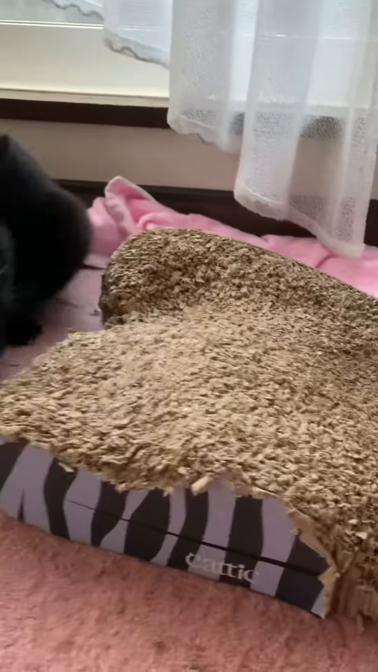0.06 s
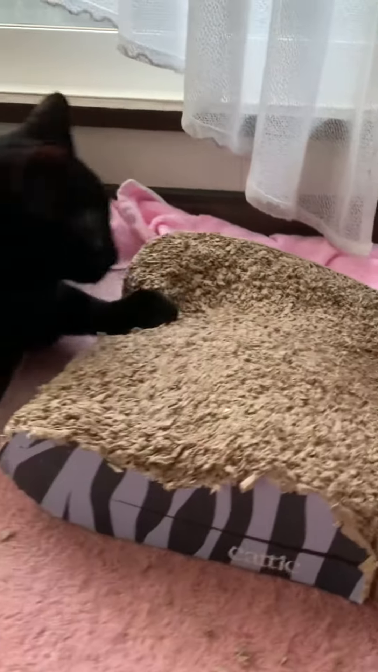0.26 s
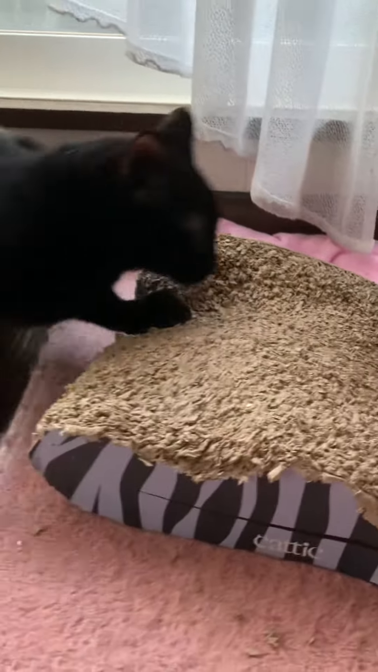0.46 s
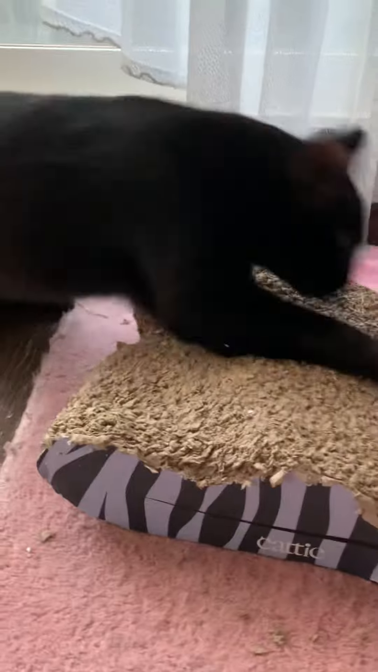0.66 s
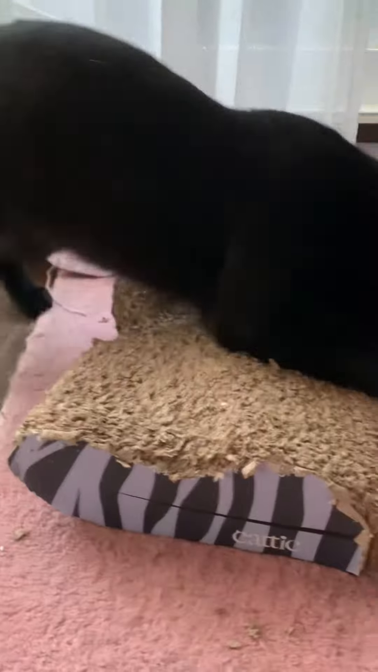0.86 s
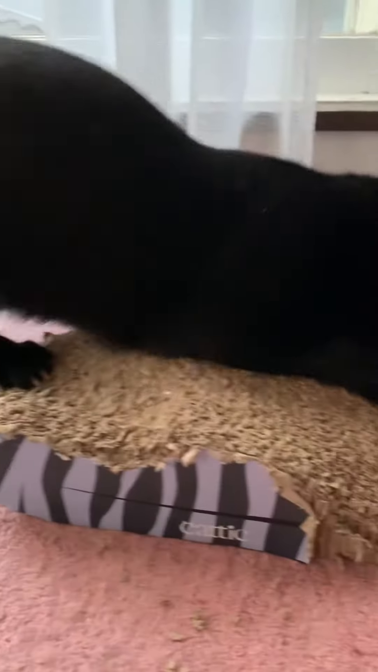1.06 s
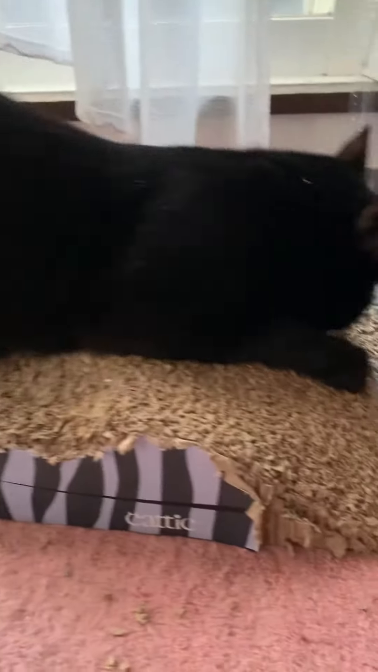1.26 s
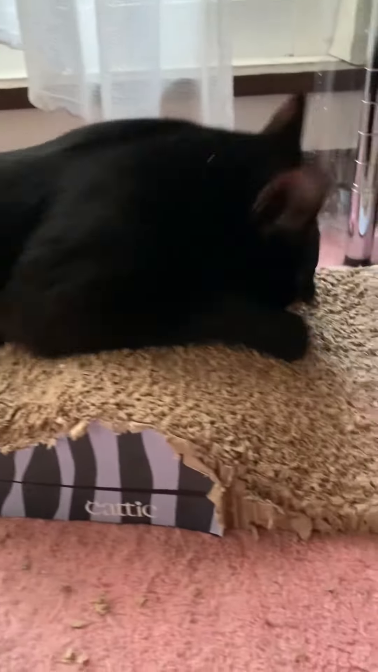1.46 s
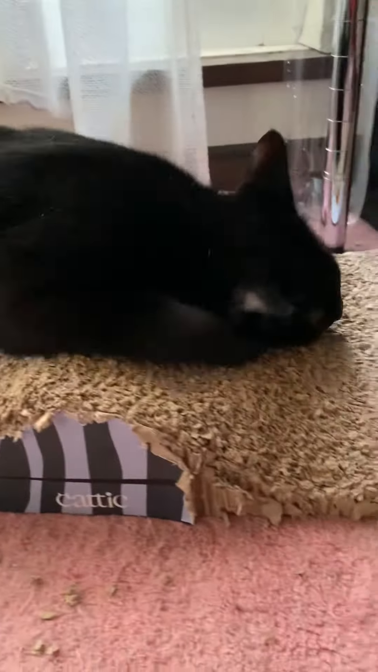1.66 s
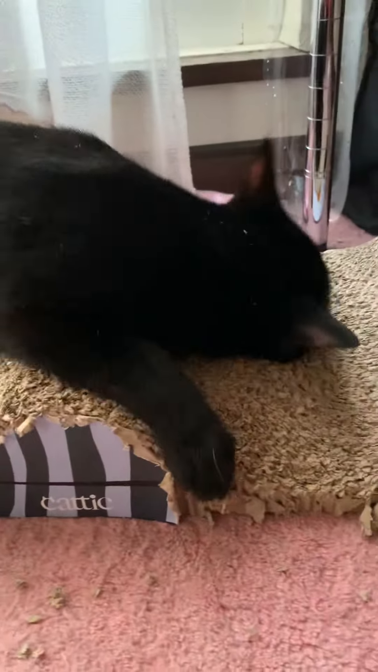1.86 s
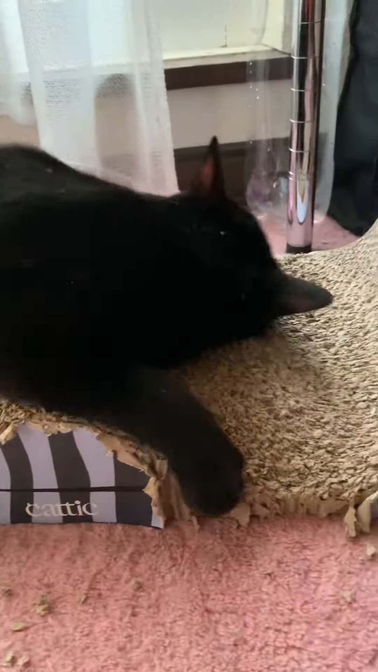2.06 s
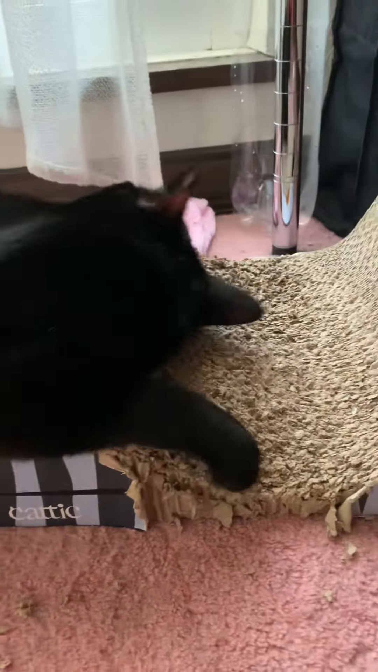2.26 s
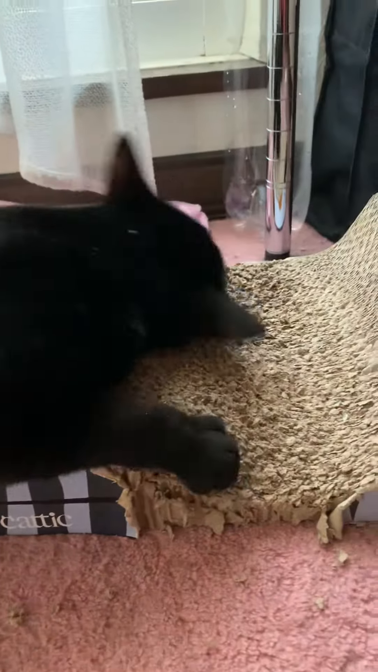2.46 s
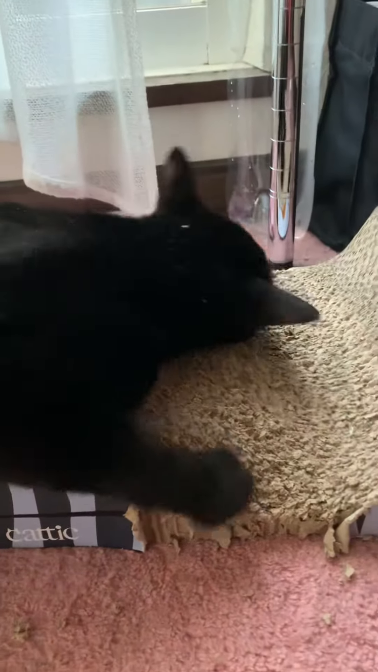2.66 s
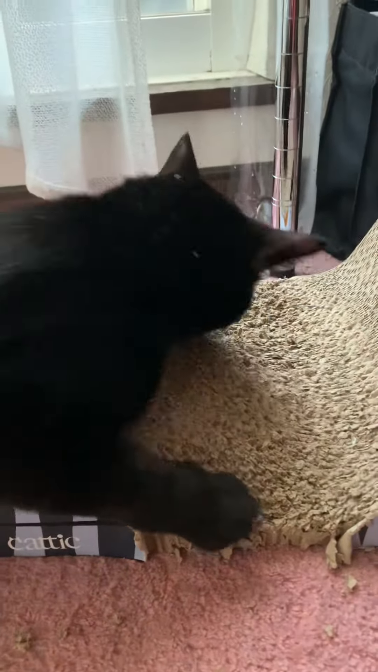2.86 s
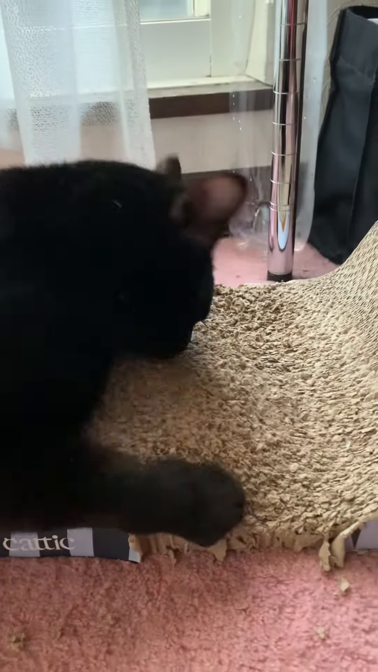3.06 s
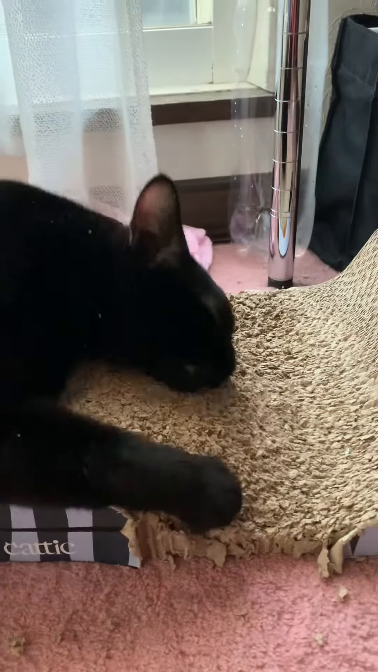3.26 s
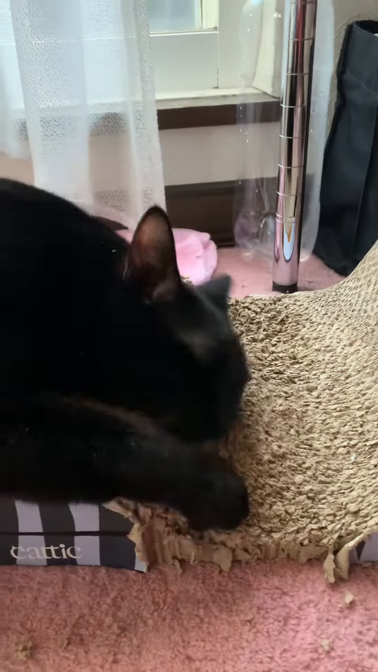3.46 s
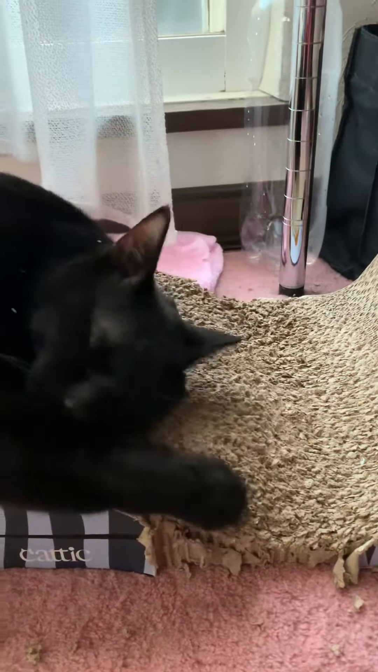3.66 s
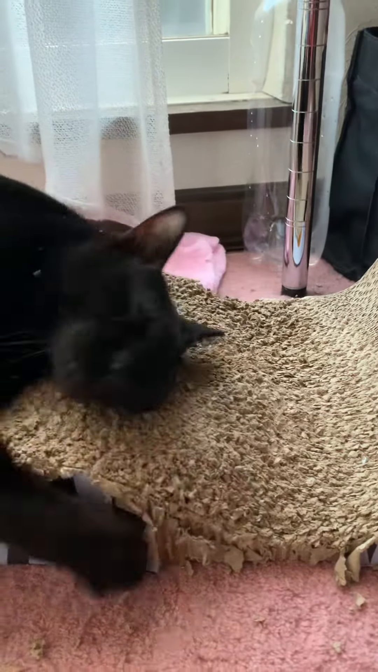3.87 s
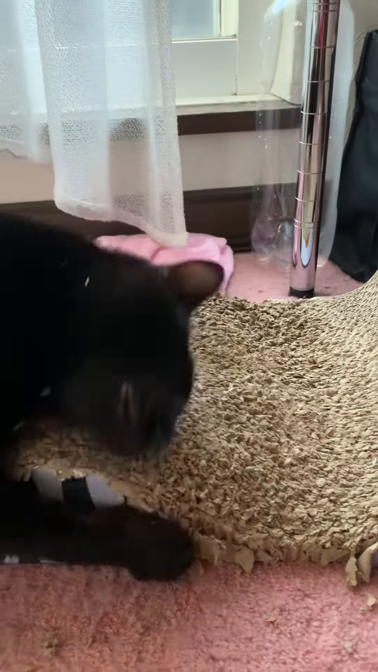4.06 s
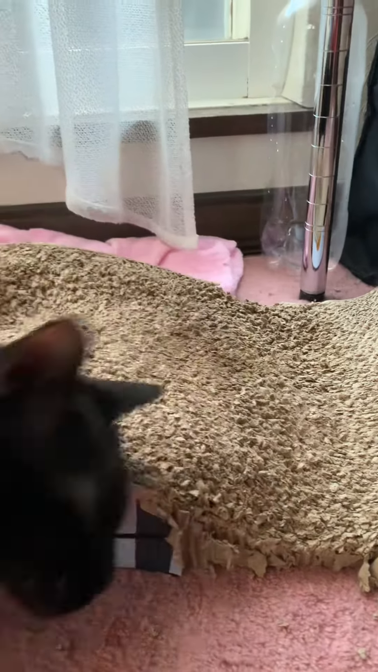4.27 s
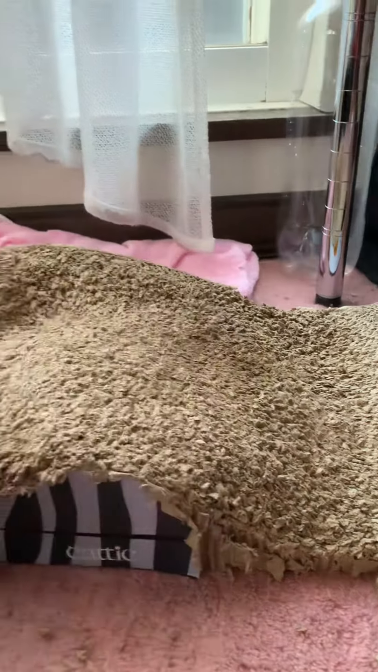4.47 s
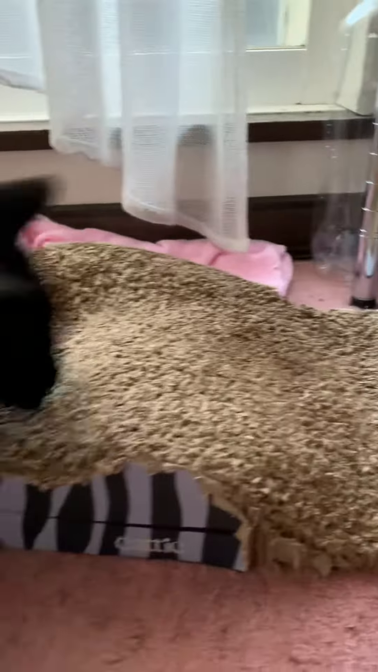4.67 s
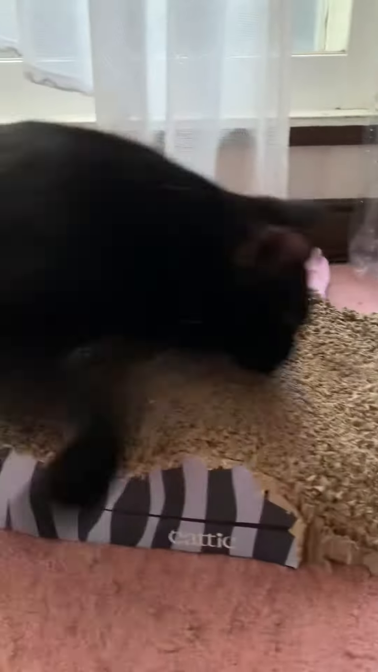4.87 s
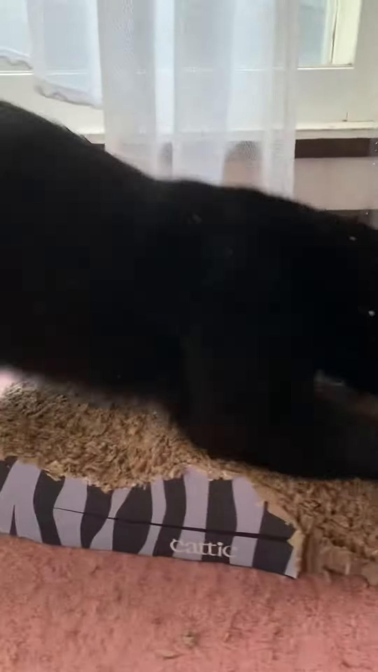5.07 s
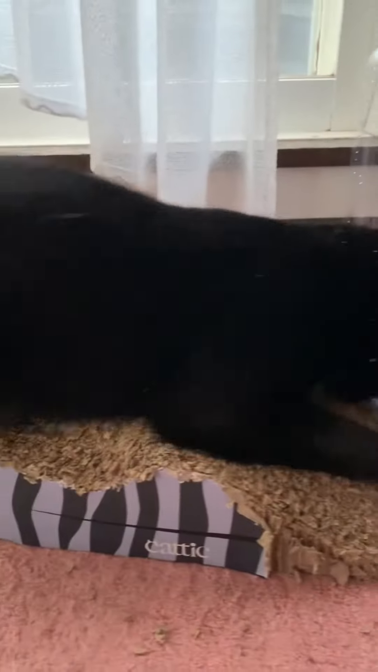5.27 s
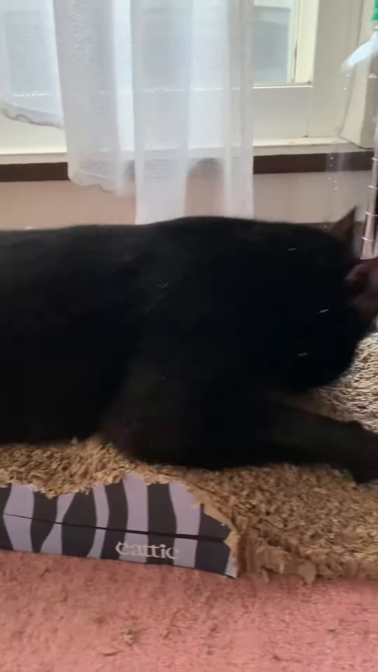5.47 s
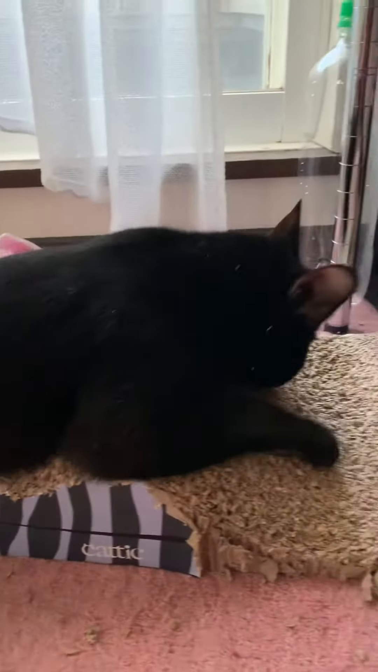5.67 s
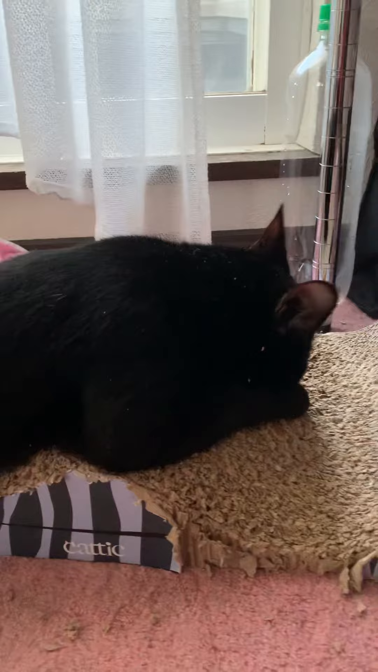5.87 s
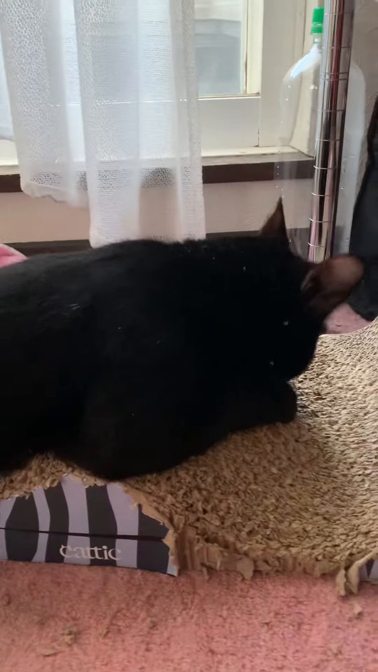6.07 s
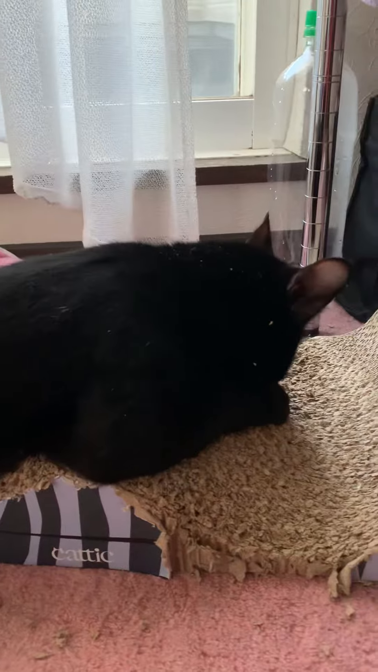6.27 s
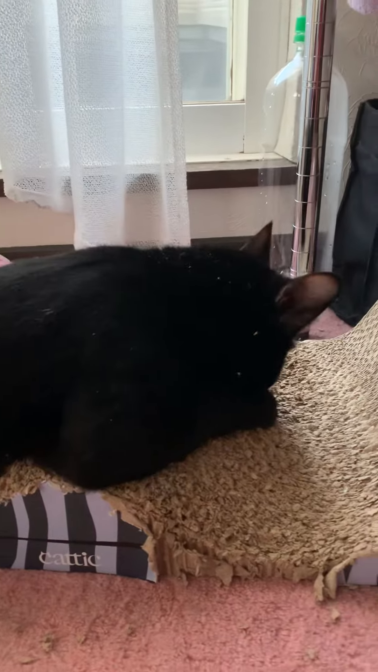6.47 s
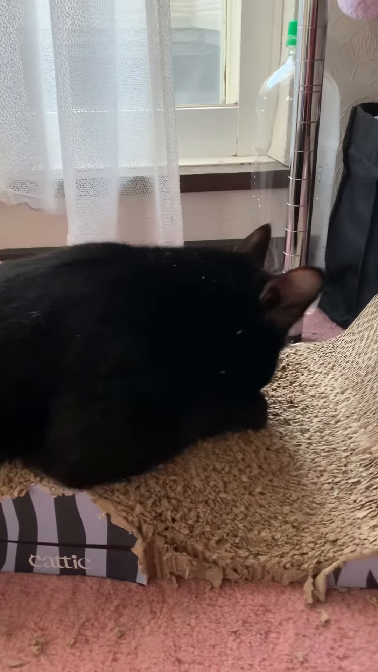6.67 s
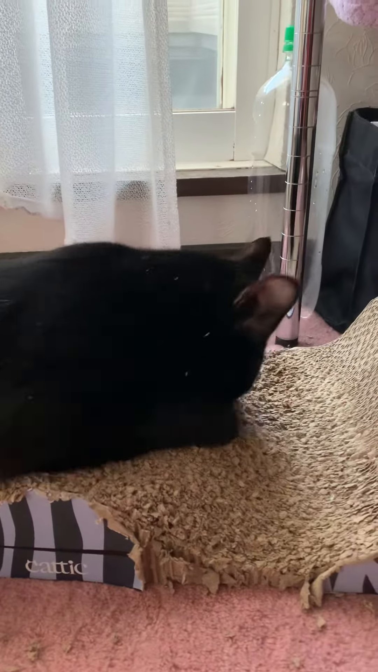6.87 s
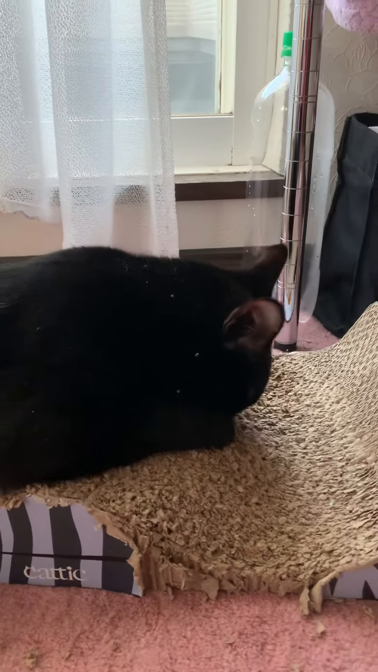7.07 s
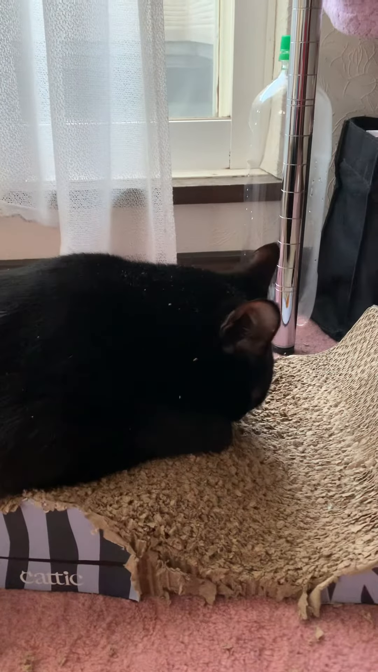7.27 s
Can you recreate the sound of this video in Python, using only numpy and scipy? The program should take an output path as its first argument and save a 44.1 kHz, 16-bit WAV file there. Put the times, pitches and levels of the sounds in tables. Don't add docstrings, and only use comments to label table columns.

```python
import sys
import numpy as np
from scipy import signal
from scipy.fft import rfft, irfft, next_fast_len
from scipy.io import wavfile
from scipy.ndimage import uniform_filter1d

SR = 44100
rng = np.random.default_rng(int(sys.argv[2]) if len(sys.argv) > 2 else 0)


def log_audio(samples):
    frames = np.atleast_2d(samples).T
    limited = np.clip(frames, -1, 1)
    pcm = np.round(limited * 32767).astype(np.int16)
    wavfile.write(sys.argv[1], SR, pcm)


def linear_from_db(decibels):
    return 10 ** (np.asarray(decibels, float) / 20)


N = 322812
TIME_S = np.arange(N) / SR
HZ = np.fft.rfftfreq(next_fast_len(N + SR), 1 / SR)

# time in seconds, pressure in dB, sharpness (fizz re crush) in dB.
CONTACT = [(0, -68.5, -1.5), (0.11, -70, -19.5), (0.33, -70, -11.5), (0.6, -76.5, -9.5), (1.15, -68.5, -13),
           (1.6, -71, -8.5), (2.45, -66, -16), (2.87, -64.5, -5.5), (3.0, -74.5, 3.5), (3.25, -65, -6),
           (3.85, -68.5, 1), (4.47, -81.5, 1), (4.7, -81, -5.5), (5.28, -68.5, -7.5), (5.86, -74, -8),
           (6.2, -83, -17), (6.7, -84, -3), (7.32, -69, -40)]
# start in seconds, length in seconds, pressure in dB, swell to the end in dB, sharpness in dB.
PULLS = [
    (1.242, 0.27, -53, -10, -26),
    (1.655, 0.42, -62, 0.9, -3),
    (2.032, 0.37, -68.5, 4, 8.5),
    (2.496, 0.24, -64, 10, -5),
    (3.46, 0.3, -82, 14.5, 8.5),
    (3.907, 0.28, -63.5, 10.5, -5.5),
    (4.276, 0.17, -51.5, -15, -7.5),
    (4.978, 0.23, -60.5, -9, -12),
    (5.32, 0.22, -64.5, 13.5, -5.5),
    (5.622, 0.19, -70, -6, -7),
]
# crest in seconds, pressure in dB, sharpness in dB, length in ms, paper hiss in dB.
STROKES = [(0.207, -56, 0, 26, -10), (0.767, -44, -43, 19, -10), (0.815, -40, -22, 58, -23),
           (0.953, -55.5, -4.5, 31, -1), (1.256, -54, 0, 8, 1), (1.353, -40, -9.5, 31, -0.5),
           (2.075, -79, 24, 17, -7), (2.116, -45, -4, 21, -10), (2.296, -47.5, -6, 41, -5),
           (2.544, -75, 26, 4.4, -16), (2.783, -37, -14, 9.9, -4), (3.345, -57.5, -14, 70, -11),
           (3.511, -51, -29, 80, 10), (3.644, -48, -39, 9.4, -5), (3.897, -39, -55, 19, -15),
           (4.587, -62, 6.5, 64, -1), (4.779, -52, -17, 46, 0), (4.982, -52.5, 0, 26, 2.5),
           (5.209, -55, -12, 27, 8), (0.812, -51, 6, 3.9, 1), (0.822, -50, 2, 7, -1),
           (5.097, -40.5, 1, 22.5, -6.5), (5.123, -55, 2, 11, 9.5), (5.523, -34.5, -24, 25, 4),
           (5.639, -53, -18, 44, 2), (5.914, -47, -11, 29, -6), (6.814, -57.5, -14, 83, -2),
           (6.847, -57, -10.5, 56, -0.5)]
# crest in seconds, pressure in dB, length in ms.
TREADS = [
    (0.474, -58.5, 53),
    (0.521, -62, 33),
    (1.904, -58, 8.3),
    (4.23, -57, 43),
    (5.341, -55, 62),
    (5.683, -55, 33),
    (6.642, -68, 110),
    (6.92, -53.5, 45),
    (7.22, -66, 44),
    (7.261, -54.5, 30),
]
# frequency in Hz, level in dB.
CRUSH_SPECTRUM = [(400, -3), (550, -2.5), (800, 0), (1150, -10), (1500, -4.5), (2300, -8), (2800, -24)]
# frequency in Hz, level in dB.
HISS_SPECTRUM = [(1900, -28.5), (2600, -0.5), (4000, 2), (5600, -8), (7000, -28.5)]
# frequency in Hz, level in dB.
FIZZ_SPECTRUM = [(4800, -20.5), (6200, 1), (8000, 4), (11000, -4.5), (13800, -8), (14700, -10),
                 (15700, -17), (16200, -38)]
# frequency in Hz, width in Hz, lift in dB.
FLUTES = [(357.4, 5.8, 6.5), (657, 26, 0), (1040, 64, 4), (1228, 36, 8)]
# time in seconds, load in dB.
LOAD = [(0.0, -65), (0.57, -60.5), (0.85, -41), (1.12, -71.5), (1.53, -53.5), (2.45, -56.5), (3.14, -59),
        (3.4, -55), (3.83, -60), (4.14, -35.5), (4.3, -46.5), (4.56, -65), (4.83, -55), (5.3, -51.5),
        (5.55, -36), (5.69, -59.5), (6.22, -72), (7.32, -71.5)]
# frequency in Hz, level in dB.
SWAY_SPECTRUM = [(25, -42), (40, 13), (62, 18), (80, 12.5), (110, 8.5), (140, -61.5)]
# frequency in Hz, level in dB.
GROAN_SPECTRUM = [(100, -2), (135, 8), (200, 5), (300, -6.5), (480, -9), (650, -44)]
# crest in seconds, level in dB, rasp in Hz, length in ms.
RIPS = [(0.058, -68, 3180, 49), (0.373, -62, 480, 39), (4.3, -58, 3870, 120), (2.294, -47, 850, 32),
        (2.712, -53, 2280, 30), (3.209, -53.5, 1660, 16), (3.54, -53, 6700, 72), (4.086, -50, 3560, 110),
        (1.358, -58, 1640, 36), (1.31, -61.5, 2350, 44), (0.82, -66, 2300, 13), (0.944, -56.5, 3450, 8),
        (2.681, -56, 2300, 27), (1.19, -64, 1380, 33), (3.82, -69, 2000, 110), (5.345, -61, 1990, 30),
        (5.525, -42.5, 3860, 17), (6.93, -61, 674, 55), (7.135, -65, 720, 36), (0.273, -68, 830, 19),
        (0.828, -47, 3770, 11.7), (1.36, -57, 3080, 21), (1.73, -65, 4350, 63), (1.84, -60, 3900, 59),
        (2.07, -59, 4870, 54), (2.31, -58, 7650, 50), (3.15, -70, 2700, 63), (3.56, -59, 3600, 78),
        (4.135, -53.5, 1290, 9.6), (5.099, -47.5, 4200, 16), (5.371, -54, 2020, 11),
        (5.384, -54, 2160, 6.6), (5.913, -57, 854, 43), (6.848, -56, 1120, 16), (7.078, -65.5, 665, 23),
        (7.134, -64.5, 1510, 28), (7.225, -65.5, 1300, 55)]
# crest in seconds, level in dB, frequency in Hz, length in ms.
CREAKS = [(0.284, -58.5, 237, 56), (0.48, -60, 366, 41), (0.72, -56, 147, 140), (0.89, -54, 257, 43),
          (1.075, -53, 73, 110), (1.86, -55.5, 125, 77), (2.3, -48, 290, 69), (3.08, -56, 141, 43),
          (3.93, -54, 256, 46), (4.14, -46, 109, 46), (4.39, -48, 255, 160), (4.375, -50, 397, 43),
          (4.49, -65, 186, 100), (5.03, -44, 150, 60), (5.104, -39, 380, 21), (5.17, -52.5, 252, 21),
          (5.15, -58, 148, 64)]
# time in seconds, peak in dB, ring in Hz, bright tick in dB re peak.
TICKS = [(0.1547, -58, 2150, -29), (0.3045, -50, 4470, -5), (0.5276, -56, 4130, -32),
         (0.5527, -54, 4280, -24), (0.6649, -42, 2200, -9.5), (0.7895, -41.5, 1780, -3),
         (1.1279, -43.5, 3880, -3), (2.155, -33, 3960, -5), (2.4036, -47, 6500, -7),
         (2.6658, -35, 2260, -22), (2.7085, -27, 2250, -22), (2.7818, -34, 4350, 3),
         (2.831, -34.5, 2540, -11), (3.2879, -44.5, 5900, 1), (3.7252, -47, 3800, 5),
         (4.7294, -38, 6400, -34), (4.8902, -39.5, 3900, -29), (5.1552, -37, 3680, -13),
         (5.943, -45, 1660, -8), (6.6482, -49, 2480, -23), (7.0758, -48.5, 1540, -20)]
# time in seconds, peak in dB, ring in Hz.
SNAPS = [(0.174, -43.5, 2260), (0.205, -46, 840), (0.461, -42, 1070), (0.638, -32.5, 645),
         (0.765, -27.5, 650), (0.808, -24.5, 780), (0.943, -44, 797), (1.106, -51, 910), (1.238, -36, 1350),
         (1.252, -30, 1040), (1.386, -29.5, 1550), (2.233, -34, 680), (2.292, -25.5, 710),
         (2.385, -36, 1820), (2.773, -21.5, 610), (4.761, -34, 600), (4.973, -22.5, 694), (5.197, -41, 750),
         (5.214, -36.5, 1860), (5.317, -30.5, 1790), (5.401, -40, 1450), (5.886, -42, 960),
         (5.904, -39.5, 830), (6.765, -38, 1510), (7.12, -50, 720), (7.255, -40, 1330),
         (3.404, -39.5, 1020)]
# time in seconds, peak in dB.
FLICKS = [(1.476, -42.5), (2.536, -32), (2.557, -37), (2.47, -53), (3.205, -34), (3.279, -43.5),
          (3.316, -38), (3.339, -33), (5.068, -31.5), (5.455, -31.5), (5.48, -34), (5.617, -33.5)]
# time in seconds, peak in dB, frequency in Hz, cycles to fade.
PLUCKS = [(0.18, -47, 387, 1.1), (0.156, -52, 2400, 3.1), (0.529, -46.5, 4060, 2.8),
          (1.132, -51, 3760, 5.3), (0.206, -52, 1900, 1.2), (0.269, -56.5, 1610, 2.4),
          (0.463, -47, 1090, 2.5), (0.518, -49, 920, 1.1), (0.7685, -47, 740, 2), (0.792, -41, 2000, 0.67),
          (0.809, -40, 1040, 2.4), (0.824, -51, 1380, 1.6), (1.241, -41, 1410, 1.4),
          (1.281, -48, 2500, 1.6), (1.3475, -42, 1800, 1.8), (1.387, -33, 1700, 1.4),
          (1.428, -45, 2200, 2.2), (1.4936, -49, 1190, 2), (1.661, -47, 1690, 1.2), (1.735, -46, 4500, 0.8),
          (1.933, -47, 2010, .9), (2.1565, -41, 1750, 1.3), (2.305, -44, 7500, .9), (2.298, -41, 810, 2.4),
          (2.539, -39, 890, 2.5), (2.56, -35, 1180, 0.44), (2.668, -41, 2200, 2.5), (2.691, -34, 2440, 2.5),
          (2.773, -35, 1010, 0.98), (3.28, -40, 5340, 1.2), (3.407, -43, 2400, 1.2),
          (3.639, -53, 1500, 1.4), (3.737, -39, 6940, 1.2), (4.891, -44.5, 7400, 3.4),
          (4.972, -32.5, 7450, 2.1), (5.0696, -34, 1570, 1.3), (5.156, -29.5, 6300, 0.87),
          (5.316, -27.5, 1890, 1.5), (5.403, -44, 1430, 1.8), (5.442, -37, 3900, 1.1),
          (5.457, -36, 1640, 2.7), (5.48, -34, 4400, 2.4), (5.645, -45, 690, 2.2), (5.679, -45.5, 766, 3.3),
          (6.911, -50, 1400, 2.2), (7.165, -63, 1470, 3), (7.198, -54, 1400, 2.2)]
# time in seconds, peak in dB.
SLIPS = [(0.355, -50), (1.4754, -38), (2.5175, -45), (2.536, -49), (2.647, -38), (3.2053, -32),
         (3.213, -35), (3.375, -39), (4.73, -42.5), (4.8905, -45), (4.96, -36), (5.071, -43), (5.156, -40),
         (5.619, -46), (5.775, -57), (6.887, -52)]
# time in seconds, peak in dB, frequency in
# Hz.
MORE_PLUCKS = [(2.4045, -39, 6700), (2.4705, -51, 9500), (2.5363, -27, 8300), (2.5374, -26, 13300),
               (2.5592, -31, 9610), (2.5592, -29, 15000), (2.7725, -35, 9500), (3.3175, -39, 10000),
               (3.34, -28, 6400), (3.7257, -34, 11400), (3.7257, -41, 13400), (6.8466, -49, 780),
               (7.2558, -42.5, 1400), (6.767, -53, 2800), (0.847, -31, 142), (4.277, -27, 251),
               (3.6, -43.5, 1150), (2.4047, -48, 13000), (2.296, -38.5, 1000), (5.1, -43, 7000),
               (4.73, -57, 510)]
# crest in seconds, peak in dB, frequency in Hz, length in ms.
THUMPS = [(0.681, -23.5, 62.3, 26), (0.782, -31, 76.4, 8.3), (0.862, -42, 87, 11),
          (0.984, -25.5, 71.5, 16.5), (1.314, -22.5, 73.3, 33), (1.409, -29.5, 77.4, 16),
          (1.449, -32, 62, 2.6), (2.047, -31, 83, 5.3), (4.991, -24.5, 128, 5.2), (3.376, -36.5, 114, 15),
          (4.054, -28, 73.6, 13), (4.178, -26.5, 61.6, 39), (4.303, -19, 94.5, 13.5), (4.359, -36, 66, 49),
          (4.474, -20, 69, 16.2), (4.534, -42.5, 71.2, 81), (4.795, -30, 59, 29), (5.011, -13, 70, 13.5),
          (5.082, -34.5, 77, 67), (5.121, -25.5, 77.6, 6.8), (5.35, -19, 74.5, 18.3),
          (5.523, -33, 89.5, 28), (5.567, -21, 72.7, 23), (5.674, -40, 64.4, 52), (5.956, -50, 56.5, 31),
          (6.879, -40.5, 94.5, 4.6), (6.931, -57.5, 81, 45)]
# crest in seconds, peak in dB.
STEPS = [(0.205, -45.5), (0.83, -33), (1.531, -46.5), (1.676, -33.5), (2.414, -45), (3.497, -41),
         (3.914, -32), (4.087, -31), (4.259, -37), (5.191, -38.5), (5.409, -29), (5.453, -37),
         (5.62, -35.5), (5.856, -47.5), (6.105, -55), (7.081, -58)]
# time in seconds, peak in dB, frequency in Hz.
KNOCKS = [(0.642, -32, 121), (0.771, -44, 182), (0.839, -24.5, 132), (0.961, -39.5, 127), (1.283, -30, 124),
          (1.356, -35, 155), (1.384, -34.5, 181), (1.65, -42, 186), (1.897, -35, 420), (1.935, -36.5, 460),
          (2.272, -43, 191), (2.544, -37.5, 385), (2.775, -27, 171), (3.209, -39.5, 132),
          (3.279, -37.5, 134), (3.342, -32.5, 224), (3.499, -36, 304), (3.649, -37, 184), (3.92, -38, 195),
          (4.278, -20, 147), (4.35, -31.5, 154), (4.767, -28.5, 130), (4.978, -22, 130), (5.074, -25, 129),
          (5.321, -27.5, 162), (5.482, -27, 175), (5.531, -22.5, 167), (5.619, -35.5, 179.9),
          (5.904, -42, 245), (6.774, -48, 131)]
# frequency in Hz, level in dB.
AIR_SPECTRUM = [(25, -12), (65, -10), (130, -31), (300, -39), (1200, -42), (6000, -45.5), (14000, -46.5),
                (15500, -40)]
# frequency in Hz, unlike share.
WIDE_SHARE = [(200, 0.0101), (500, 0.21), (1500, 0.47), (2500, 0.69), (4000, 0.69), (5600, 0.73),
              (7800, 0.68), (8500, 0.26)]

TREAD_SHARP_DB, HISS_SHARE, HISS_DB = -38, 0.62, -1.5
PULL_EDGE_S = 0.068
RISE_QUICKER = 0.98
GROAN_DB, GROAN_SHARE, CREASE_DB = -69, 0.68, -1.5
RASP_WIDTH = 1.241
SNAP_TICK_DB, FLICK_TICK_DB, FLICK_HZ, TICK_DULL_HZ = -25, -4.5, 720, 8100
BEND_CYCLES = 1.8
SLIP_HZ, SLIP_CYCLES, MORE_PLUCK_CYCLES = 4200, 0.28, 1.6
STEP_HZ, STEP_MS = 70, 18
BOARD_RING_DB, BOARD_RING_S = -15.5, 0.14
AIR_DB = -74
PORT_LAG_S, LAG_FROM_HZ, IN_STEP_HZ = 1 / 3200, 5600, 10240


def evened(x):
    return x / np.sqrt(np.mean(x ** 2) + 1e-20)


def read(points):
    f, value = np.transpose(points)
    return np.interp(np.log(HZ + 1), np.log(f + 1), value, left=value[0], right=value[-1])


def shape(x, response):
    size = 2 * (len(HZ) - 1)
    return irfft(rfft(x, size) * response, size)[..., :N]


def add(mix, start_s, sound):
    part = mix[..., max(round(start_s * SR), 0):][..., :sound.shape[-1]]
    part += sound[..., :part.shape[-1]]


def curve(rows):
    s, *columns = np.transpose(rows)
    return [np.interp(TIME_S, s, column) for column in columns]


def bandpass(order, low_hz, high_hz):
    return signal.butter(order, [low_hz, high_hz], "band", fs=SR, output="sos")


def swell(ms):
    half = int(ms * SR / 1000)
    u = np.arange(-half, half) / SR / (ms / 1800)
    return np.exp(-abs(u * np.where(u < 0, RISE_QUICKER, 1)) ** 3)


def layers(pressure_db, sharp_db, hiss_db=0):
    paper_db = pressure_db + HISS_DB + hiss_db + HISS_SHARE * sharp_db
    return linear_from_db(np.array([pressure_db, paper_db, pressure_db + sharp_db]))


def effort():
    gains = layers(*curve(CONTACT))
    for s, length_s, db, swell_db, sharp_db in PULLS:
        t = np.arange(-PULL_EDGE_S, length_s + PULL_EDGE_S, 1 / SR)
        hold = np.clip(np.minimum(t, length_s - t) / PULL_EDGE_S + .5, 0, 1)
        pressure_db = db + swell_db * np.clip(t / length_s, 0, 1)
        add(gains, s - PULL_EDGE_S, hold * layers(pressure_db, sharp_db))
    treads = [(s, db, TREAD_SHARP_DB, ms, 0) for s, db, ms in TREADS]
    for s, db, sharp_db, ms, hiss_db in list(STROKES) + treads:
        add(gains, s - ms / 1000, layers(db - 6.5, sharp_db, hiss_db)[:, None] * swell(ms))
    return gains


def flutter(depth_db, ms):
    width = max(int(ms * SR / 1000), 2)
    drift = uniform_filter1d(uniform_filter1d(rng.standard_normal(N), width), width)
    return linear_from_db(depth_db * evened(drift))


def fibres(per_s, spread_db):
    size = linear_from_db(spread_db * np.minimum(rng.exponential(1, N), 5)) * rng.choice([-1., 1.], N)
    return size * (rng.random(N) < per_s / SR)


def catches(per_s, spread_db, cycles):
    train = fibres(per_s, spread_db)
    which = rng.integers(0, 16, N)
    out = np.zeros(N)
    for k, hz in enumerate(np.geomspace(250, 9000, 16)):
        turns = np.arange(int(4 * cycles * SR / hz)) * hz / SR
        pluck = np.sin(2 * np.pi * turns) * np.exp(-turns / cycles)
        out += signal.oaconvolve(train * (which == k), pluck / np.linalg.norm(pluck))[:N]
    return evened(out)


def patchy(x, depth_db):
    z = signal.stft(x, nperseg=512)[2]
    patches = uniform_filter1d(rng.standard_normal(z.shape), size=7, axis=0)
    patches = evened(uniform_filter1d(patches, size=9, axis=1))
    return signal.istft(z * linear_from_db(depth_db * patches), nperseg=512)[1][:N]


def hollow():
    return sum(db / (1 + (2 * (HZ - hz) / width_hz) ** 2) for hz, width_hz, db in FLUTES)


def rubbing(gains):
    crush, hiss, fizz = gains
    drag = flutter(depth_db=1.46, ms=9.0)
    coarse = catches(per_s=1500, spread_db=2.5, cycles=2.5) * drag
    fine = patchy(evened(fibres(per_s=7000, spread_db=3.0)) * drag, depth_db=2.5)
    out = crush * evened(shape(coarse + 1.63 * fine, linear_from_db(read(CRUSH_SPECTRUM) + hollow())))
    out += hiss * evened(shape(0.24 * coarse + fine, linear_from_db(read(HISS_SPECTRUM))))
    return out + fizz * evened(shape(0.17 * coarse + fine, linear_from_db(read(FIZZ_SPECTRUM))))


def sway(crush):
    load_db = curve(LOAD)[0]
    boards = evened(shape(rng.standard_normal(N), linear_from_db(read(SWAY_SPECTRUM))))
    creases = evened(fibres(per_s=400, spread_db=2.5)) + 0.09 * rng.standard_normal(N)
    body = evened(shape(creases, linear_from_db(read(GROAN_SPECTRUM) + hollow())))
    groan = linear_from_db(GROAN_DB + GROAN_SHARE * (load_db + 53.0))
    groan = groan + linear_from_db(CREASE_DB) * uniform_filter1d(crush, size=900)
    return linear_from_db(load_db + 2.0) * boards + groan * body


def rips():
    crackle, out = fibres(per_s=1800, spread_db=2.0), np.zeros(N)
    for s, db, hz, ms in list(RIPS) + list(CREAKS):
        bell, start_s = swell(ms), max(s - ms / 1000, 0)
        piece = crackle[round(start_s * SR):][:len(bell)]
        rasp = signal.sosfilt(bandpass(3, hz / RASP_WIDTH, hz * RASP_WIDTH), piece)
        add(out, start_s, linear_from_db(db) * bell * evened(rasp))
    return out


def snaps(rows, ms, tail, edge_hz):
    out, u = np.zeros(N), np.arange(1800) / SR
    tears = rng.standard_normal((len(rows), 2, len(u)))
    bright = np.vstack([signal.butter(3, edge_hz, "high", fs=SR, output="sos"),
                        signal.butter(1, TICK_DULL_HZ, "low", fs=SR, output="sos")])
    fade = (1 - np.exp(-u / 0.00074)) * (np.exp(-u / (ms / 1000)) + tail * np.exp(-u / 0.013))
    for (s, db, hz, tick_db), tear in zip(rows, tears):
        ring = signal.sosfilt(bandpass(3, hz * 0.59, hz * 1.26), tear[0] * fade)
        tick = signal.sosfilt(bright, tear[1] * fade ** 2.75)
        both = ring / abs(ring).max() + linear_from_db(tick_db + 11.5) * tick / abs(tick).max()
        add(out, s - .0005, linear_from_db(db - 7.0) * both)
    return shape(out, np.exp(-2j * np.pi * BEND_CYCLES * np.log(np.clip(HZ, 300, 1300) / 1300)))


def plucks():
    out = np.zeros(N)
    slips = [(*row, SLIP_HZ, SLIP_CYCLES) for row in SLIPS]
    more_plucks = [(*row, MORE_PLUCK_CYCLES) for row in MORE_PLUCKS]
    for s, db, hz, cycles in list(PLUCKS) + slips + more_plucks:
        turns = np.arange(2400) * hz / SR
        fade = (1 - np.exp(-turns / 0.54)) * np.exp(-turns / max(cycles, .2))
        ring = np.sin(2 * np.pi * turns) * fade
        add(out, s - .5 / hz, linear_from_db(db) * ring / abs(ring).max())
    return out


def thumps():
    out, u = np.zeros(N), np.arange(-4000, 6000) / SR
    for s, db, hz, ms in list(THUMPS) + [(*row, STEP_HZ, STEP_MS) for row in STEPS]:
        bell = np.exp(-.5 * (u / (0.51 * ms / 1000 * np.where(u > 0, 1.25, 1))) ** 2)
        ring = (1 - bell) * (u > 0) * np.exp(-abs(u) / BOARD_RING_S) * (1 - u / u[-1])
        cycles = hz * u * (1 - 3 * u * bell) + rng.random()
        boom = (bell + linear_from_db(BOARD_RING_DB) * ring) * np.cos(2 * np.pi * cycles)
        add(out, s - 4000 / SR, linear_from_db(db) * boom)
    return out


def knocks():
    out, u = np.zeros(N), np.arange(2600) / SR
    fade = np.exp(-u / 0.012) + 0.34 * np.exp(-u / 0.054)
    for s, db, hz in KNOCKS:
        blow = rng.standard_normal(len(u)) * fade
        shake = signal.sosfilt(bandpass(2, hz * 0.57, hz * 1.3), blow)
        add(out, s - .006, linear_from_db(db - 1.0) * shake / abs(shake).max())
    return shape(out, np.exp(-2j * np.pi * 1.663 * np.log(np.clip(HZ, 90, 1000) / 1000)))


def room(x):
    u = np.arange(9000) / SR
    taps = rng.choice([-1., 1.], (2, len(u))) * (rng.random((2, len(u))) < .05)
    taps = taps * linear_from_db(-60 * u / 0.13) * (u > .002)
    taps = signal.lfilter([1, -.9], [1], taps)
    return signal.oaconvolve(x[None], taps / np.linalg.norm(taps[0]), axes=1)[:, :N]


def scene():
    deep = [(*row, SNAP_TICK_DB) for row in SNAPS]
    frayed = [(*row, FLICK_HZ, FLICK_TICK_DB) for row in FLICKS]
    claws = snaps(TICKS, ms=1.0, tail=0.11, edge_hz=3600)
    claws += snaps(deep + frayed, ms=1.7, tail=0.59, edge_hz=1260)
    gains = effort()
    near = rubbing(gains) + sway(gains[0]) + rips() + claws + plucks() + thumps() + knocks()
    hush = linear_from_db(AIR_DB) * evened(shape(rng.standard_normal(N), linear_from_db(read(AIR_SPECTRUM))))
    return near * linear_from_db([[-.9], [.9]]) + linear_from_db(-4.5) * room(near) + hush


def roll_off(x):
    return signal.sosfilt(signal.butter(12, 16460, fs=SR, output="sos"), x)


def record(dry):
    mid = dry.mean(0)
    z = signal.stft(mid, nperseg=256)[2]
    wander = np.exp(2j * np.pi * rng.random(z.shape))
    wide = np.clip(read(WIDE_SHARE), 0, 1)
    alike = np.sqrt(1 - wide ** 2)
    side = 1.05 * shape(signal.istft(z * wander, nperseg=256)[1][:N], wide)
    side += shape(mid, .2j * np.clip((2500 - HZ) / 1000, 0, 1))
    top = np.clip((HZ - 2200) / 2500, 0, 1)
    both = shape(dry, (1 - top) * alike) + shape(mid, top * alike)
    turn = 2 * np.pi * PORT_LAG_S * (HZ - IN_STEP_HZ + 3 / PORT_LAG_S)
    turn = turn - 0.26 * np.sin(2 * turn)
    lag = np.exp(-1j * turn * np.clip((HZ - LAG_FROM_HZ) / 500 + .5, 0, 1))
    ports = np.array([shape(both[0] + side, lag), both[1] - side])
    treble_cut = np.clip((16300 - HZ) / 1500, 0, 1) ** 2
    bass_cut = 1 / np.sqrt(1 + (38 / (HZ + 1)) ** 8)
    return roll_off(shape(ports, treble_cut * bass_cut))


dry = scene()
out = record(dry)
log_audio(out)
```